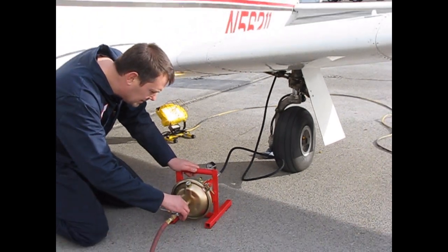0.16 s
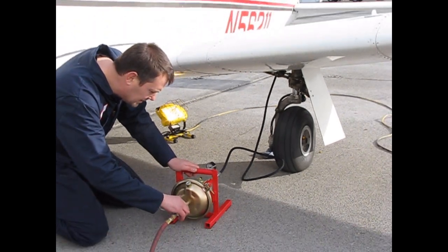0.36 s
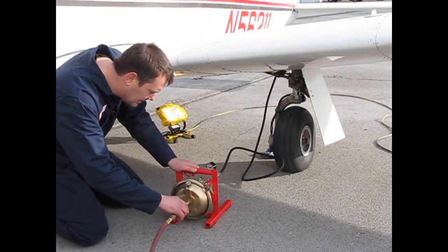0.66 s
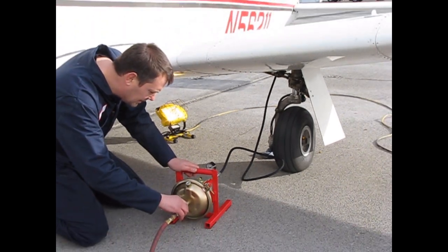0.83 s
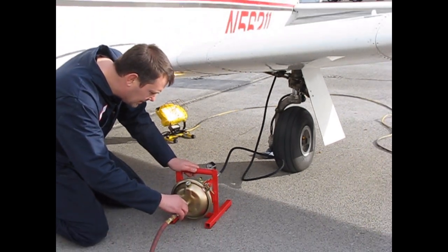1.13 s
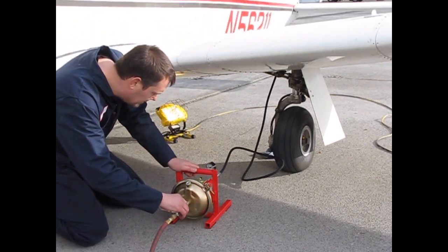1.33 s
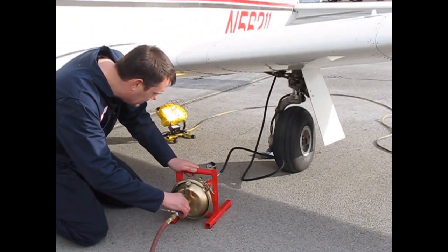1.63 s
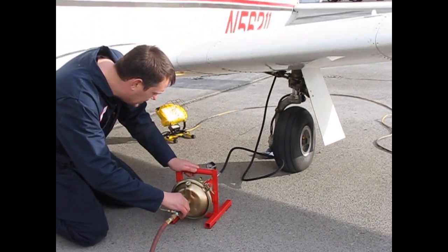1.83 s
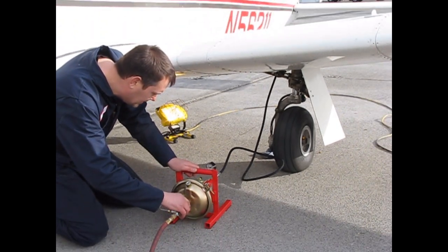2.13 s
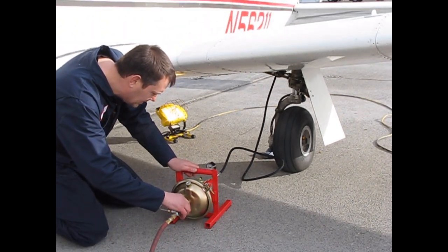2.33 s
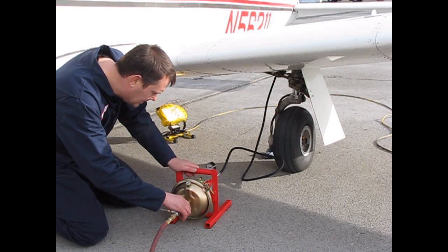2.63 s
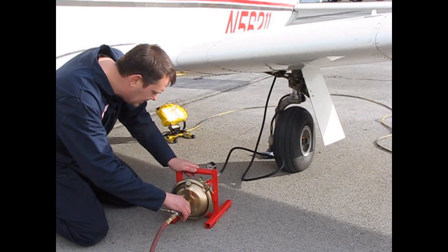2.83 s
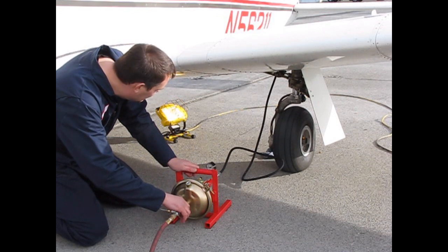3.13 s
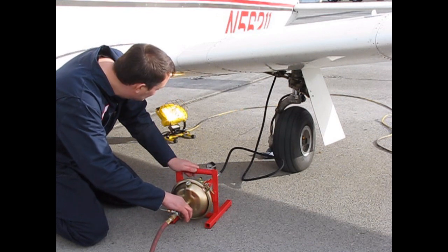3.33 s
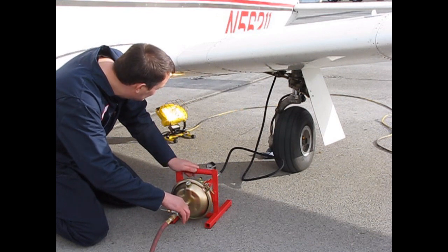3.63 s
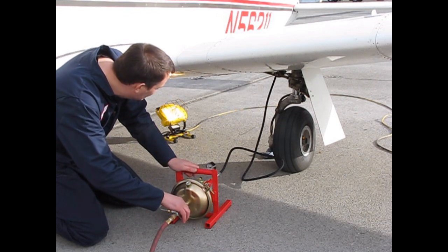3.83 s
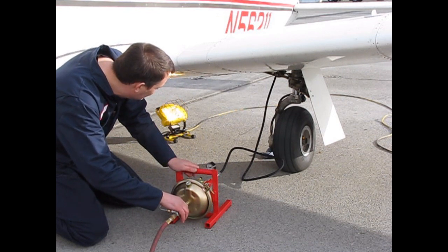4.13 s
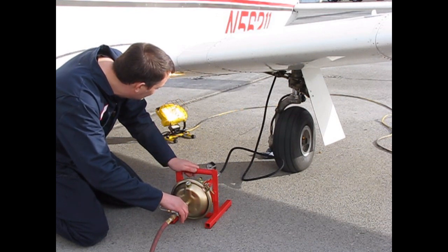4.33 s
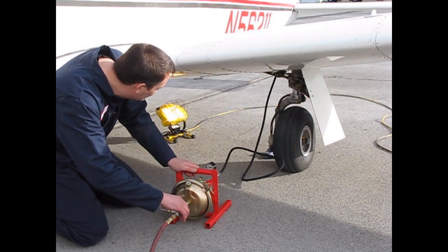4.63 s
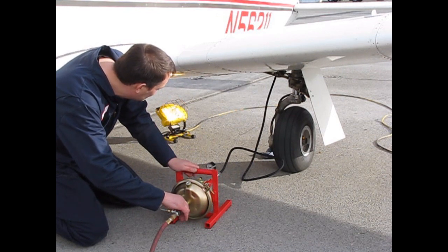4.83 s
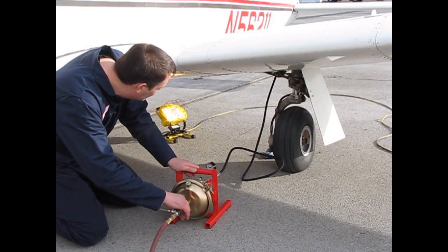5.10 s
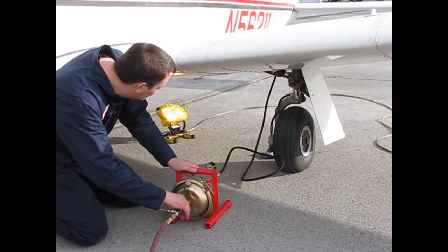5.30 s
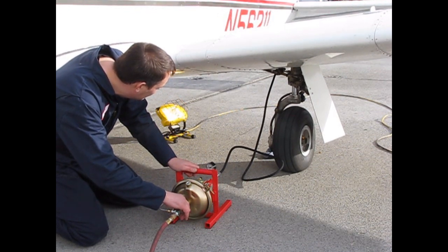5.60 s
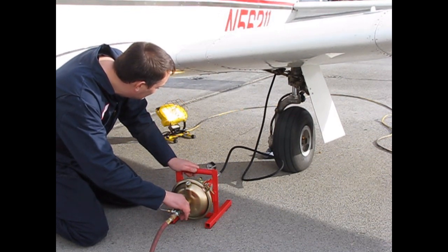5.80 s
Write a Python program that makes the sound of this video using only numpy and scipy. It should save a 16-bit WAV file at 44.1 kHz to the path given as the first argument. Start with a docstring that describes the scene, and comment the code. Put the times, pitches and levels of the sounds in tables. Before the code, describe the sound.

Outdoors on a paved apron, a pneumatic pump works close to a stereo microphone. Low, lumpy wind and distant machinery rumble throughout with a weak hum, a barely audible beating high whine and light microphone hiss. A soft bump comes at once, then at 0.2 s a tick and a loud, bright vent of air, rushing with gliding whistles, swelling again before cutting off near 0.95 s. The rumble sinks, then slowly returns. At 1.5 s a very short, sharp spit opens into a breathy sigh with thin pipe-like whistles, fading by about 2.4 s. From 2.9 to 3.4 s metal fittings click, knock and rattle with gritty scuffs. The second long hiss bursts out at 3.4 s and stops near 4.15 s, leaving a faint seep. Small bumps precede another spit at 4.95 s, whose whistling sigh dwindles into gusty rumble until the end, around 6 s.

```python
"""Air-driven pump on an apron

Twice the pump vents in a long hiss; twice it refills with a spit and a whistling sigh: shaped, coloured noise.
Gliding narrow-band noise whistles in the air; noise cracks and decaying modes make fittings tick and bump.
Wind and far machinery rumble in filtered noise that drops soon after each valve opens, then comes back slowly.
A hum and two close steady tones that beat in the treble join them, and the microphone hisses."""
import sys
import numpy as np
from scipy import signal
from scipy.fft import rfft, irfft, next_fast_len
from scipy.io import wavfile
from scipy.ndimage import uniform_filter1d

SR = 44100
rng = np.random.default_rng(int(sys.argv[2]) if len(sys.argv) > 2 else 0)


def generate_wav(signal):
    """Clip the signal to [-1, 1] and save it as 16-bit WAV at the path in sys.argv[1]."""
    frames = np.transpose(np.atleast_2d(signal))
    scaled = np.clip(frames, -1, 1) * 32767
    pcm = np.round(scaled).astype(np.int16)
    wavfile.write(sys.argv[1], SR, pcm)


N = 262836   # samples
LEFT_RIGHT = np.array([[1], [-1]])


def from_db(db):
    """Amplitude factor of a level."""
    return 10 ** (np.asarray(db) / 20)


def rms_one(x):
    """Signal scaled to rms 1."""
    return x / np.sqrt(np.mean(x ** 2) + 1e-20)


def in_time(rows):
    """Columns of a table, interpolated to every sample."""
    s, *columns = np.transpose(rows)
    return [np.interp(np.arange(N) / SR, s, c) for c in columns]


def at_hz(points, hz):
    """Table value at each frequency, interpolated over log frequency."""
    points = np.array(points)
    return np.interp(np.log(np.maximum(hz, 1)), np.log(points[:, 0]), points[:, 1])


def drift(corner_hz):
    """Slow chance of spread 1: noise through two equal poles, computed at SR / 10."""
    pole = np.exp(-20 * np.pi * corner_hz / SR)
    white = rng.standard_normal(N // 10 + 4002)
    slow = signal.lfilter([1], [1, -2 * pole, pole * pole], white)[4000:]
    return np.interp(np.arange(N) / 10, np.arange(len(slow)), rms_one(slow))


def air(spectrum, likeness, balance=((100, 0), (200, 0)), phase=((0, 0), (1, 0)), edge_db_per_octave=26.0):
    """Stereo noise of a given colour, likeness, balance and phase lead; mid rms 1."""
    size = next_fast_len(N)
    hz = np.fft.rfftfreq(size, 1 / SR)[1:]
    below = np.maximum(spectrum[0][0] / hz, 1)
    above = np.maximum(hz / spectrum[-1][0], 1)
    gain = from_db(at_hz(spectrum, hz) - edge_db_per_octave * np.log2(below * above))
    mid, side = rfft(rng.standard_normal((2, size)))[:, 1:]
    alike = np.clip(at_hz(likeness, hz), -1, 1)
    pair = np.sqrt(1 + alike) * mid + np.sqrt(1 - alike) * side * LEFT_RIGHT
    pair = pair * gain * from_db(at_hz(balance, hz) / 2 * LEFT_RIGHT)
    pair = pair * np.exp(.5j * np.interp(hz, *np.transpose(phase)) * LEFT_RIGHT)
    out = irfft(np.pad(pair, ((0, 0), (1, 0))), size)[:, :N]
    return out / np.sqrt(np.mean(out.mean(axis=0) ** 2))


# stereo image of the pump: (frequency [Hz], left-right likeness [-1..1])
PUMP_LIKENESS = [(60, .45), (150, 1), (400, 0.39), (1000, 0.92), (2400, 0.88), (6000, 0.67), (15000, 0.98)]
# (frequency [Hz], left minus right [dB])
PUMP_BALANCE = [(60, -1.5), (130, -0.5), (290, -0.5), (640, -1), (1410, 0.5), (3100, -0.5), (6820, 1.5),
                (15000, 2.5)]
# (frequency [Hz], left leads by [rad])
PUMP_PHASE = [(0, 1.3), (2670, 0.62), (4480, 0.25), (9730, 0.87), (10800, 1.3), (12200, -0.099),
              (14800, -0.74), (15800, 0.2), (16500, 0.86)]


def pump_air(spectrum, flutter_db):
    """Turbulent air from the pump: eddies make it flutter fast and slowly."""
    flutter = from_db(flutter_db * (drift(330.0) + 0.29 * drift(25.)))
    return air(spectrum, PUMP_LIKENESS, PUMP_BALANCE, PUMP_PHASE) * rms_one(flutter)


def streaky(x, depth_db, width_bins=2, hold_frames=37):
    """Faint narrow bands swell and fade at random in the moving air."""
    cells = signal.stft(x, nperseg=512, noverlap=384)[2]
    chance = rng.standard_normal(cells.shape[1:])
    for _ in range(2):
        chance = uniform_filter1d(chance, size=width_bins, axis=0)
        chance = uniform_filter1d(chance, size=hold_frames, axis=1)
    gain = rms_one(from_db(depth_db * rms_one(chance)))
    return signal.istft(cells * gain, nperseg=512, noverlap=384)[1][:, :N]


def placed(shape, s, level_db):
    """A stroke's shape moved to its moment and level."""
    return [(s + after, *(level_db + np.array(db))) for after, *db in shape]


def strokes(tables, column, open_s, shut_s):
    """Summed gain of one dB column over all strokes: ramped in, dying away after the last row."""
    t, gain = np.arange(N) / SR, 0
    for rows in tables:
        rise = np.clip((t - rows[0][0]) / open_s, 0, 1) ** 2
        fall = np.exp(-np.maximum(t - rows[-1][0], 0) / shut_s)
        gain = gain + from_db(in_time(rows)[column]) * rise * fall
    return gain


DIP_AFTER_VENT_S, DIP_AFTER_REFILL_S = 0.14, .04   # dip starts after the valve opens
DIP_SINK_S = 0.036   # time constant


def rumble_dip_db(back_s, lead_s):
    """The background rumble drops soon after each valve opens, then comes back slowly."""
    dips = [(s + DIP_AFTER_VENT_S - lead_s, db) for s, _, db in VENTS]
    dips += [(row[0] + DIP_AFTER_REFILL_S, row[4]) for row in REFILLS]
    total_db = 0
    for s, db in dips:
        since = np.maximum(np.arange(N) / SR - s, 0)
        total_db = total_db - db * (1 - np.exp(-since / DIP_SINK_S)) * np.exp(-since / back_s)
    return total_db


# gusts on the microphone ports, before dip and drift: (time [s], level [dB], left minus right [dB])
WIND = [(0.0, -50, -4), (0.16, -46.5, 1), (0.9, -45, 0.5), (1.44, -43, 1.5), (1.7, -46, -0.5),
        (2.16, -43.5, -0.5), (2.54, -44.5, 1), (2.75, -45, -2), (3.2, -40.5, -7), (3.39, -42.5, 0),
        (3.92, -47.5, -13), (4.4, -40.5, -2.5), (4.61, -38.5, -5), (4.72, -45, -11), (4.86, -37.5, -6),
        (5.05, -50.5, -12), (5.4, -44.5, -2.5), (5.7, -43.5, -11), (5.88, -38.5, -11.5), (5.96, -52, -10)]
# (frequency [Hz], relative level [dB per Hz])
WIND_COLOUR = [(8.8, -37), (15, -1.5), (43, 6.5), (78, 5), (147, -12), (183, -9.5), (265, -24),
               (317, -18.5), (400, -27.5), (520, -51), (880, -120)]
# (frequency [Hz], left-right likeness [-1..1])
WIND_LIKENESS = [(25, 0.51), (60, 0.39), (150, 1)]
WIND_DIP_SHARE, WIND_BACK_S = 1.3, 0.88   # share of the dip [dB/dB], return time constant
WIND_DIP_LEAD_S = .04   # dips sooner in vents


def wind():
    """Lumpy low noise that follows the gusts."""
    level_db, pan_db = in_time(WIND)
    dip_db = WIND_DIP_SHARE * rumble_dip_db(WIND_BACK_S, WIND_DIP_LEAD_S)
    gust_db = level_db + dip_db + 0.52 * drift(8.) + pan_db / 2 * LEFT_RIGHT
    return air(WIND_COLOUR, WIND_LIKENESS) * from_db(gust_db)


# far machinery: (frequency [Hz], relative level [dB per Hz])
APRON_COLOUR = [(59, -31), (100, -5), (185, -11.5), (337, -22.5), (422, -23.5), (730, -24), (1060, -25.5),
                (1120, -29.5), (1500, -31.5), (1600, -31), (6000, -64.5), (7800, -94), (13200, -120)]
# (frequency [Hz], left-right likeness [-1..1])
APRON_LIKENESS = [(60, 0.4), (150, 1), (380, 0.93), (950, 0.62), (2380, 0.02), (5980, 0.08), (15000, 0.14)]
APRON_DB, DIP_BACK_S = -48, 1.05   # level before dips, return time constant
HUM_HZ, HUM_DB = 178, -66.5   # mean peak level
WHINE_HZ, WHINE_DB = (7854, 7881), -92   # rms of each tone


def machinery():
    """Far rumble of coloured noise, a wavering hum, and two close steady tones that beat."""
    t = np.arange(N) / SR
    rumble = air(APRON_COLOUR, APRON_LIKENESS) * from_db(APRON_DB + rumble_dip_db(DIP_BACK_S, 0))
    hum = from_db(HUM_DB + 2.5 * drift(3.)) * np.sin(2 * np.pi * HUM_HZ * t)
    tones = sum(np.sin(2 * np.pi * (hz * t + rng.random())) for hz in WHINE_HZ)
    return rumble + hum + from_db(WHINE_DB) * np.sqrt(2) * tones


# metal fittings: (frequency [Hz], width before a 0.55 factor [Hz], relative level [dB])
FITTING_MODES = [(1777, 91, -16), (2660, 370, -2.5), (3850, 590, -1), (6640, 450, -11), (7260, 280, -13.5),
                 (10000, 840, -15.5)]
PAN_SCATTER_DB = 2


def knocks(events, colour, split_hz, ring_db, t60_s, side_db):
    """Each knock is a crack of noise, duller or brighter, and rings the metal fittings briefly."""
    crack = air(colour, PUMP_LIKENESS)
    dull = signal.sosfilt(signal.butter(2, split_hz, fs=SR, output="sos"), crack)
    out, t = np.zeros((2, N)), np.arange(SR // 5) / SR
    hz, width_hz, mode_db = np.transpose(FITTING_MODES)[:, :, None]
    chance = rng.standard_normal((len(events), len(hz) + 1, 1))
    ringing = np.exp(-np.pi * .55 * width_hz * t) * np.sin(2 * np.pi * hz * t)
    for (s, peak_db, bright_db), own in zip(events, chance):
        near = slice(round(s * SR), round(s * SR) + SR // 5)
        noise = dull[:, near] + from_db(bright_db + 8.5) * (crack - dull)[:, near]
        noise = noise * from_db(-11.0 - 60 * t / max(t60_s, .004))
        struck = from_db(mode_db + 3.5 * own[1:] + ring_db + (hz > split_hz) * (bright_db + 10.0))
        rings = (struck * ringing).sum(axis=0)
        pan_db = side_db + PAN_SCATTER_DB * own[0, 0]
        out[:, near] += from_db(peak_db) * (noise + rings) * from_db(pan_db / 2 * LEFT_RIGHT)
    return out


# fittings and frame: (time [s], nominal peak [dB], relative brightness [dB])
TICKS = [(0.2134, -27, 6), (2.902, -47.5, -15), (2.9515, -35.5, -16), (2.9863, -24.5, -13.5),
         (3.0085, -18.5, -15), (3.0134, -23, -15.5), (3.039, -29, -11.5), (3.0763, -17, -13.5),
         (3.0918, -29, -15), (3.0972, -22.5, -15), (3.1187, -35, -4), (3.126, -23, -24),
         (3.1348, -18.5, -11), (3.1396, -29, -7.5), (3.1478, -28.5, -7), (3.1872, -42, -4),
         (3.2071, -36, -5), (3.3234, -29.5, -9), (3.3488, -40, 1), (3.3771, -34, 0)]
# (frequency [Hz], relative level [dB per Hz])
TICK_COLOUR = [(350, -45.5), (600, -21.5), (1270, -16.5), (2510, -8), (3940, -1), (5390, -5.5),
               (9680, -4.5), (11200, -16), (15600, -31.5)]
# spells of faint rattling: (from [s], to [s], rate [1/s], mean nominal peak [dB])
RATTLE = [(2.922, 2.98, 40, -53), (3.19, 3.234, 70, -46), (3.326, 3.384, 70, -41)]
RATTLE_SPREAD_DB, RATTLE_BRIGHT_DB = 4, -1.5
TICK_T60_S, TICK_PAN_DB = .024, 5


def ticks():
    """Sharp knocks of fittings, with faint chance rattling between them."""
    rattle = []
    for start, end, rate, peak_db in RATTLE:
        for _ in range(round(rate * (end - start))):
            rattle.append((rng.uniform(start, end), rng.normal(peak_db, RATTLE_SPREAD_DB), RATTLE_BRIGHT_DB))
    return knocks(TICKS + rattle, TICK_COLOUR, 4600.0, -11.0, TICK_T60_S, TICK_PAN_DB)


# frame and hose: (time [s], nominal peak [dB], relative brightness [dB])
BUMPS = [(0.049, -28.5, -17.5), (1.022, -40, -2.5), (1.79, -36.5, -13), (4.71, -51, -12),
         (4.78, -38, -11.5), (5.219, -40, -17.5), (5.243, -36, -16)]
# (frequency [Hz], relative level [dB per Hz])
BUMP_COLOUR = [(180, -42), (300, 1.5), (610, -14), (1360, -10), (4970, -17.5), (13000, -33)]
BUMP_T60_S, BUMP_PAN_DB = 0.058, 3


def bumps():
    """Soft knocks of frame and hose that hardly ring."""
    return knocks(BUMPS, BUMP_COLOUR, 2700.0, -14.0, BUMP_T60_S, BUMP_PAN_DB)


# under the ticks: (time [s], duration [s], level [dB], fading [dB/s])
SCUFF = [(2.986, 0.073, -53.5, 120), (3.08, 0.093, -54.5, 20), (3.182, 0.049, -50, 40),
         (3.322, 0.078, -46.5, 180)]
# (frequency [Hz], relative level [dB per Hz])
SCUFF_COLOUR = [(530, -26), (900, -2.5), (1380, -8.5), (1540, -12), (2630, -5), (5660, -10), (8690, -8.5),
                (15600, -17.5)]


def scuffs():
    """Rubbing as grainy, fluttering noise."""
    rows = [[(s, db), (s + lasts, db - fading * lasts)] for s, lasts, db, fading in SCUFF]
    return strokes(rows, 0, 0.004, .016) * pump_air(SCUFF_COLOUR, 1.7)


# jet, per vent: (from [s after opening], to [s after opening], from [Hz], to [Hz], width [Hz], rms [dB])
VENT_WHISTLES = [(.09, .31, 6300, 5700, 90, -36), (.185, .43, 10750, 8000, 302, -43),
                 (.44, .6, 7700, 7600, 90, -46.5), (0.52, .74, 7700, 7100, 180, -52),
                 (.32, .74, 13000, 12750, 280, -49), (.46, .75, 10100, 11000, 380, -47)]
# outlet pipe, per refill: (from [s after opening], to [s after opening], from [Hz], to [Hz], width [Hz], rms [dB])
FILL_WHISTLES = [(.1, .2, 5500, 5450, 150, -52.5), (.13, .3, 4350, 3900, 200, -54.5),
                 (0.058, .105, 7170, 7000, 80, -46), (0.057, .11, 5100, 5200, 90, -48),
                 (.077, .15, 14550, 14100, 200, -45.5), (.085, .28, 5030, 4580, 90, -46),
                 (.06, 0.168, 1150, 1230, 36, -60), (0.12, 0.19, 3205, 3240, 61, -50.5),
                 (.115, 0.18, 2005, 2015, 50, -59), (0.16, 0.265, 4050, 4000, 110, -53.5),
                 (.18, .33, 3620, 3520, 90, -56), (.25, 0.415, 2800, 3110, 40, -60),
                 (.25, 0.37, 4680, 4650, 55, -59), (.29, .49, 7550, 7300, 240, -59),
                 (.37, .73, 5170, 5210, 45, -66), (.34, .63, 4000, 3900, 84, -61.5),
                 (.39, 0.8, 2565, 2585, 40, -67)]
# heard once: (from [s], to [s], from [Hz], to [Hz], width [Hz], rms [dB])
LONE_WHISTLES = [(.45, 0.635, 4500, 4570, 350, -39), (1.532, 1.602, 4450, 4300, 50, -45),
                 (1.539, 1.585, 2590, 2900, 80, -49), (2.002, 2.16, 2770, 2780, 30, -70),
                 (3.57, 3.72, 10900, 9950, 310, -39.5), (3.689, 3.795, 5000, 4400, 500, -35),
                 (4.935, 4.965, 2727, 2764, 110, -41.5), (4.99, 5.05, 1178, 1157, 35, -51),
                 (5.401, 5.672, 3700, 3490, 60, -68)]
HOSE_NOTE_S, HOSE_NOTE_HZ = .125, 1240   # start after opening, start frequency
HOSE_NOTE_WIDTH_HZ, HOSE_NOTE_DB = 14.6, -57.5


def whistle_rows():
    """Every stroke plays the whistles of its kind; each refill bends the low hose note its own way."""
    rows = [(s + start, s + end, *tone) for s, *_ in VENTS for start, end, *tone in VENT_WHISTLES]
    rows += [(s + start, s + end, *tone) for s, *_ in REFILLS for start, end, *tone in FILL_WHISTLES]
    for s, *_, end_hz, lasts in REFILLS:
        start = s + HOSE_NOTE_S
        rows.append((start, start + lasts, HOSE_NOTE_HZ, end_hz, HOSE_NOTE_WIDTH_HZ, HOSE_NOTE_DB))
    return rows + LONE_WHISTLES


def whistles(apart=.45, steady=0.75):
    """Noise in narrow gliding resonances: tones of wandering size and phase that swell and fade."""
    out, white = np.zeros((2, N)), rng.standard_normal((4, N))
    for start, end, from_hz, to_hz, width_hz, level_db in whistle_rows():
        near = slice(round(start * SR), round(end * SR))
        count = near.stop - near.start
        draw = rng.integers(N // 2)   # each whistle wanders its own way
        lowpass = signal.butter(2, width_hz / 2, fs=SR, output="sos")
        wander = signal.sosfilt(lowpass, white[:, draw:draw + count + 2500])[:, 2500:]
        wander = wander * np.sqrt(SR / width_hz)
        mid, side = wander[:2] + 1j * wander[2:]
        # the wider the whistle, the weaker its steady core
        core = min(steady, .95) * min(50. / width_hz, 1)
        mid = np.sqrt(2) * core + np.sqrt(1 - core ** 2) * mid
        lead = np.interp(from_hz, *np.transpose(PUMP_PHASE)) / 2 * LEFT_RIGHT
        glide_hz = to_hz + (from_hz - to_hz) * np.linspace(1, 0, count) ** 1.5   # slows down
        turns = np.cumsum(glide_hz) / SR
        tone = (mid + apart * side * LEFT_RIGHT) * np.exp(1j * (2 * np.pi * turns + lead))
        pan = from_db(at_hz(PUMP_BALANCE, from_hz) / 2 * LEFT_RIGHT)
        swell = np.sin(np.pi * (np.arange(count) / count) ** 0.45) ** 0.9
        out[:, near] += from_db(level_db) * pan * swell * tone.real
    return out


PIPE_HZ, PIPE_ECHO = 645, 0.12   # resonance spacing, share reflected at the end


def pipe(x):
    """Sound runs up and down the outlet pipe: evenly spaced resonances."""
    hz = np.fft.rfftfreq(N, 1 / SR)
    ringing = irfft(rfft(x) / (1 - PIPE_ECHO * np.exp(-2j * np.pi * hz / PIPE_HZ)), N)
    return ringing * np.sqrt(1 - PIPE_ECHO ** 2)


# (valve opens [s], spit [dB], spit duration [s], sigh against shape [dB], rumble dip scale [dB],
#  hose note end [Hz], hose note duration [s])
REFILLS = [(1.49, -19, .038, -.5, 3.5, 1124, .2), (4.936, -17, 0.03, .5, 2.5, 1296, .37)]
# refill shape: (time after opening [s], sigh [dB], treble [dB])
FILL = [(0.036, -52, -36.5), (0.048, -40.5, -41.5), (0.1, -43, -43.5), (0.155, -54, -50),
        (0.29, -50, -51.5), (0.56, -61.5, -63.5), (0.72, -63.5, -74), (0.93, -66.5, -89), (1.3, -87, -86)]
# faint seeps of air: (from [s], to [s], sigh [dB], treble [dB])
SEEPS = [(4.166, 4.304, -62.5, -65.5), (5.884, 5.96, -71, -74)]
# spit, sigh, treble: (frequency [Hz], relative level [dB per Hz])
SPIT_COLOUR = [(290, -64), (500, -33.5), (1260, -33.5), (1770, -35), (2730, -21), (2980, -25.5),
               (4520, -24.5), (9290, -12), (10600, -18.5), (13100, -4), (15600, -11)]
FILL_COLOUR = [(410, -56), (700, -20), (1230, -11), (1460, -13), (1970, -12), (2220, -14), (3160, -7),
               (4740, -6), (6260, -14.5), (9000, -22.5), (11700, -51), (19800, -120)]
FILL_TREBLE = [(3530, -25), (6000, 6.5), (9430, 6.5), (11500, -3), (12700, -2), (14100, -3), (14800, -15),
               (15600, -6)]
SPIT_PEAK_S, SPIT_CLOSE_S, SEEP_FADE_S = 0.01, .015, 0.031
SPIT_START_DB, SPIT_SAG_DB, SPIT_CLOSE_DB = -4.5, -7.5, -20   # against the spit's level


def refill():
    """A bright spit, then air sighs through the outlet pipe as the pressure evens out."""
    spits = []
    for s, db, lasts, *_ in REFILLS:
        shape = [(0, SPIT_START_DB), (SPIT_PEAK_S, 0), (lasts, SPIT_SAG_DB), (lasts + SPIT_CLOSE_S, SPIT_CLOSE_DB)]
        spits.append(placed(shape, s, db))
    fills = [placed(FILL, s, sigh_db) for s, _, _, sigh_db, *_ in REFILLS]
    seeps = [[(start, *db), (end, *db)] for start, end, *db in SEEPS]
    sigh_gain, treble_gain = [strokes(fills, k, 0.0093, .028) + strokes(seeps, k, .03, SEEP_FADE_S)
                              for k in range(2)]
    spit = strokes(spits, 0, 0.0055, 0.0074) * pump_air(SPIT_COLOUR, 1.07)
    sigh = sigh_gain * pump_air(FILL_COLOUR, 1.2)
    treble = treble_gain * pump_air(FILL_TREBLE, 1.1)
    return spit + streaky(pipe(sigh + treble), 3.1)


# (valve opens [s], level against shape [dB], rumble dip scale [dB])
VENTS = [(0.186, -0.03, 21), (3.39, 0.56, 15)]
# vent shape: (time after opening [s], nozzle hiss [dB], chamber rush before a 3.5 dB cut [dB], low roar [dB])
VENT = [(0.001, -21.5, -33, -51), (0.018, -20.5, -31, -55), (0.034, -22, -20, -31), (0.14, -26, -20, -33.5),
        (0.29, -29.5, -26, -51), (0.42, -38.5, -36.5, -58.5), (0.49, -38, -38, -63.5),
        (0.735, -32, -33.5, -57.5), (0.755, -38.5, -54, -60), (0.766, -54, -49, -59),
        (0.795, -58, -63, -70)]
# hiss, rush, roar: (frequency [Hz], relative level [dB per Hz])
NOZZLE = [(180, -61.5), (300, -32), (454, -8.5), (601, -20.5), (709, -13.5), (864, -23), (1420, -20),
          (4740, -6), (8750, -7), (9980, -1), (11000, -6.5), (13000, -3.5), (15600, -6)]
RUSH = [(710, -42.5), (1200, -18), (2710, -5.5), (2920, -2), (5940, 3.5), (6680, 0), (8930, 1.5),
        (11200, -13.5), (13600, -10), (15600, -11)]
ROAR = [(35, -41), (60, -12.5), (294, -4.5), (421, -5), (472, -9), (665, -2.5), (1220, -3.5), (3000, -3),
        (3900, -41), (6600, -120)]
# (frequency [Hz], left-right likeness [-1..1])
ROAR_LIKENESS = [(100, .7), (400, .62), (2000, .66)]


def vent():
    """The nozzle hisses while the emptying chamber adds a rush and a low roar."""
    tables = [placed(VENT, s, level_db) for s, level_db, _ in VENTS]
    hiss = strokes(tables, 0, 0.005, 0.022) * pump_air(NOZZLE, 1.5)
    rush = strokes(tables, 1, 0.017, 0.017) * pump_air(RUSH, 0.5) * from_db(-3.5)
    roar = strokes(tables, 2, 0.017, 0.022) * air(ROAR, ROAR_LIKENESS, PUMP_BALANCE)
    return streaky(hiss + rush, 1.1) + roar


def scene():
    """All layers, background first."""
    return wind() + machinery() + ticks() + bumps() + scuffs() + whistles() + refill() + vent()


# (frequency [Hz], relative level [dB per Hz])
MIC_HISS = [(1500, 3.5), (4000, -2.5), (8000, -6), (15600, -13)]
MIC_HISS_DB, CUTOFF_HZ = -74.5, 16050


def record(dry):
    """The microphone adds nearly independent hiss to each channel; the top is cut steeply."""
    hiss = from_db(MIC_HISS_DB) * air(MIC_HISS, ((100, .1), (200, .1)))
    return signal.sosfilt(signal.cheby2(24, 80, CUTOFF_HZ, fs=SR, output="sos"), dry + hiss)


dry = scene()
out = record(dry)
generate_wav(out)
```